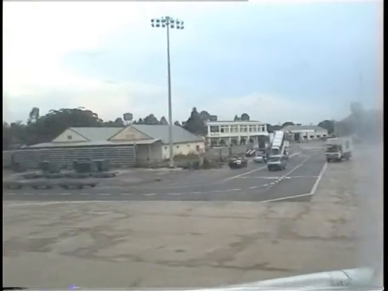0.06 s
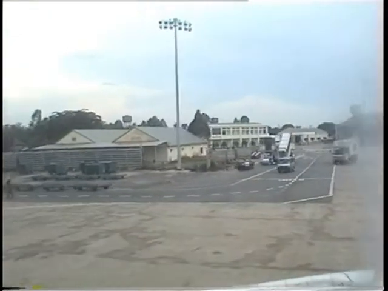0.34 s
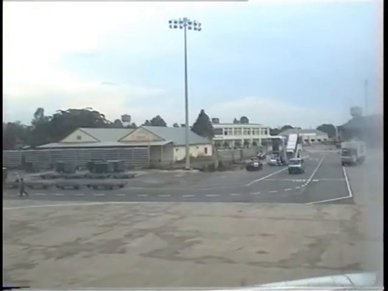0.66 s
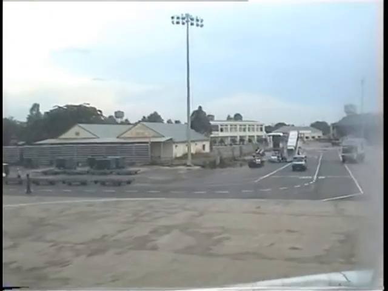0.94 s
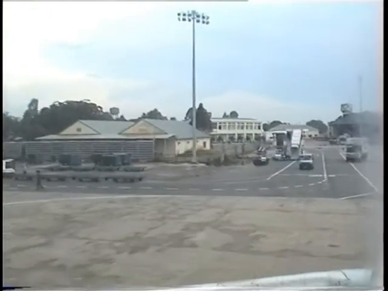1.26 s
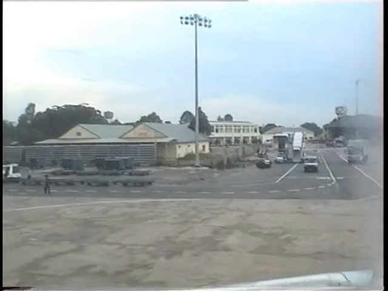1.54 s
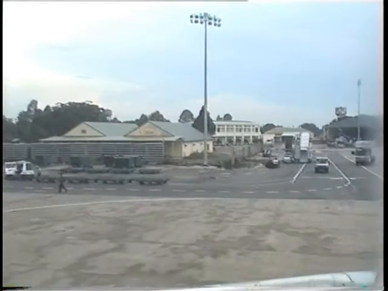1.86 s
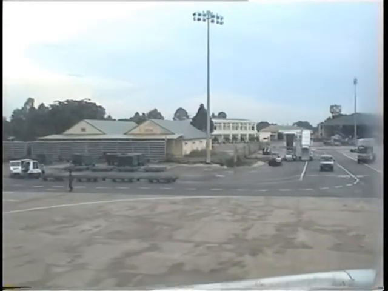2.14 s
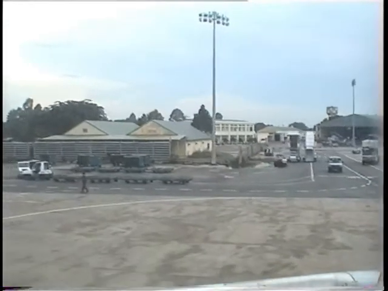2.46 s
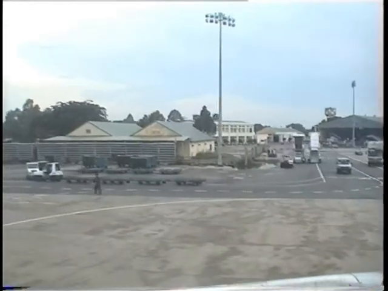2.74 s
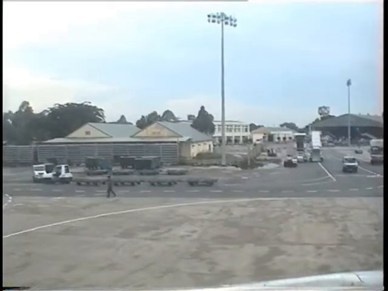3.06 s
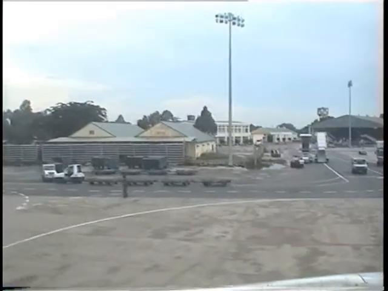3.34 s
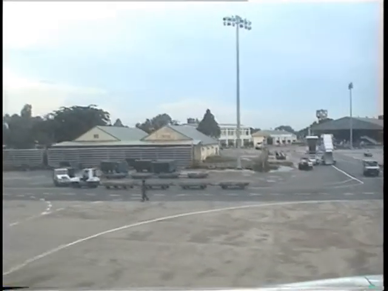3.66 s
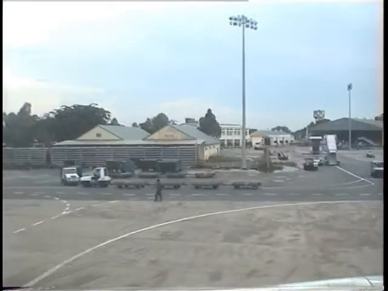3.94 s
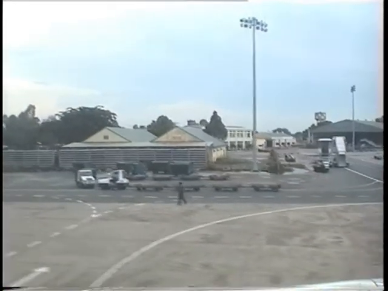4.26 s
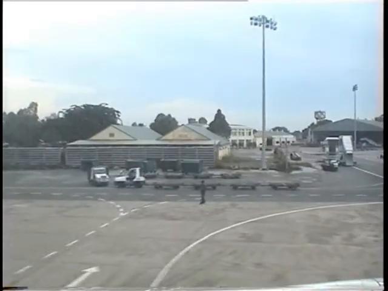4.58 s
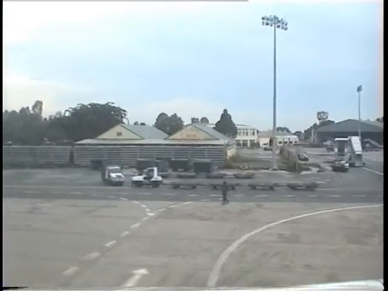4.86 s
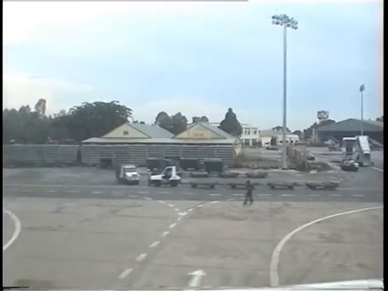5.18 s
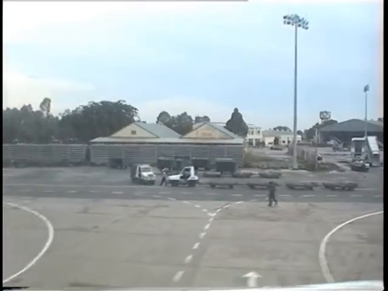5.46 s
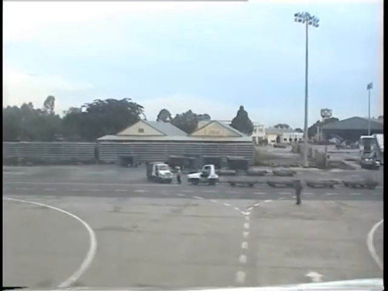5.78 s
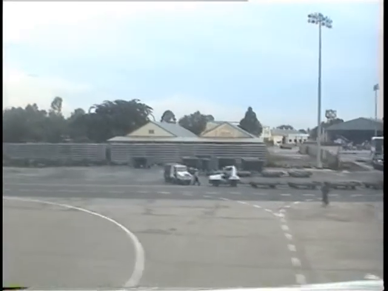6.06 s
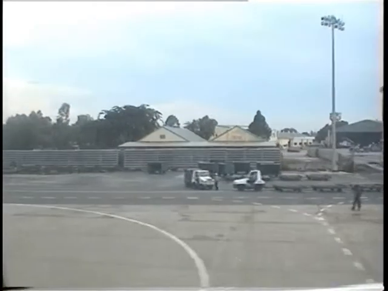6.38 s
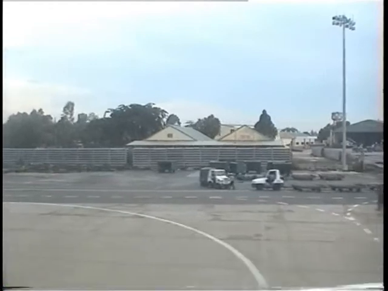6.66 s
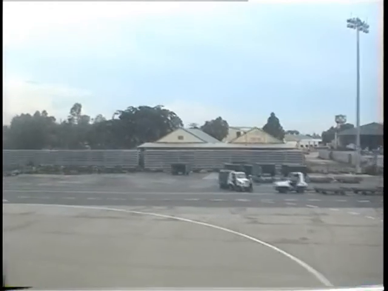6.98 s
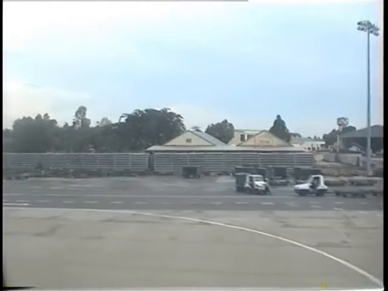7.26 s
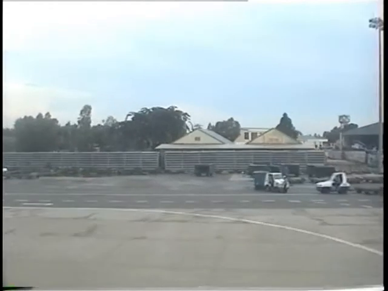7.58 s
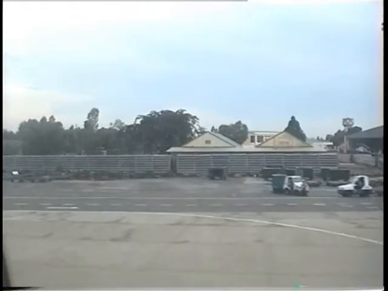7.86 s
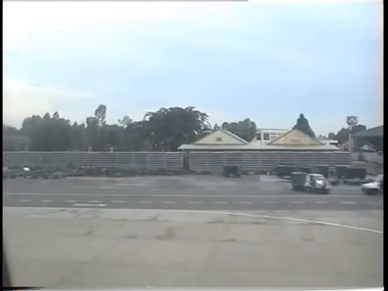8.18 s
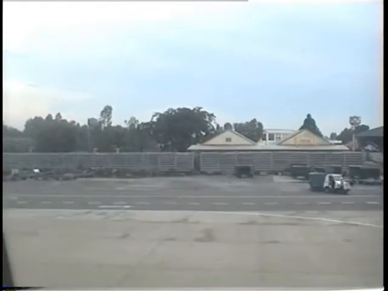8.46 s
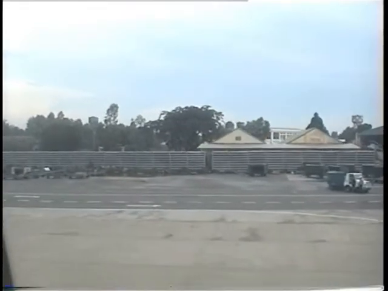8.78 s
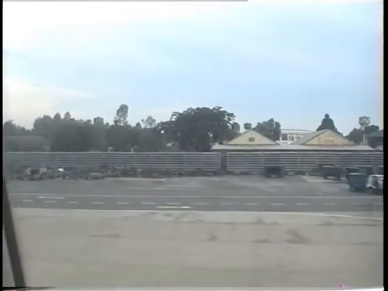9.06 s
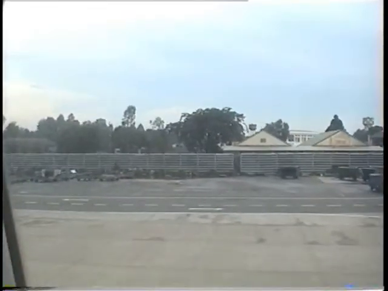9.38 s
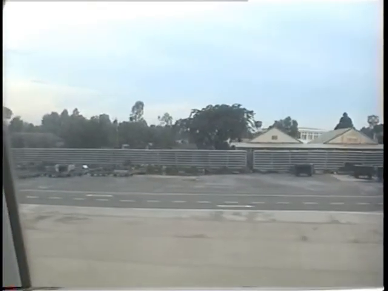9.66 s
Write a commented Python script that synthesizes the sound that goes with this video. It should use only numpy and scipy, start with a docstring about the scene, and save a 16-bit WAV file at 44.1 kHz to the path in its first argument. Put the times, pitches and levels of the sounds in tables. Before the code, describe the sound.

Heard from a window seat inside a taxiing airliner, idling jet engines make a low throbbing hum and a higher, slowly beating drone. Cabin air rushes all around and the wheels rumble under the floor, with faint thin whistles high above. From about halfway, soft thumps come from joints in the concrete, and nearby plastic panels rattle lightly and more often.

```python
"""Airliner cabin, taxiing and turning on the apron with the jets at idle; stereo pair at a window seat.
From outside, the engine shafts drive a throbbing hum and a higher, slowly beating drone through the hull.
The wheels rumble and thump under the floor, the cabin booms and air rushes all round the microphones.
Close by, trim panels rattle and fittings tick as the plane rolls; thin whistles stand high above it all."""
import sys
import numpy as np
from scipy import signal
from scipy.fft import rfft, irfft
from scipy.io import wavfile

SR = 44100
rng = np.random.default_rng(int(sys.argv[2]) if len(sys.argv) > 2 else 0)


def transcribe(signal):
    """Save signal, clipped to [-1, 1], as a 16-bit WAV file at the path in sys.argv[1]."""
    frames = np.atleast_2d(signal).T
    limited = np.clip(frames, -1, 1)
    pcm = np.round(limited * 32767).astype(np.int16)
    wavfile.write(sys.argv[1], SR, pcm)


N = 437472
TIME = np.arange(N) / SR
FREQS = np.maximum(np.arange(N // 2 + 1) * SR / N, 1)


def from_db(db):
    """Decibels to gain."""
    return 10 ** (np.asarray(db) / 20)


def rms_one(x):
    """Scale to unit rms."""
    return x / np.sqrt(np.mean(x ** 2) + 1e-20)


def in_time(rows):
    """Each column of a timed table, read at every sample."""
    times, *columns = np.transpose(rows)
    return [np.interp(TIME, times, column) for column in columns]


def over_hz(points):
    """A table read at every frequency, on a log axis."""
    hz, value = np.transpose(points)
    return np.interp(np.log(FREQS), np.log(hz), value)


def drift(rate_hz):
    """Smooth random wander of rms 1 that changes about `rate_hz` times a second."""
    count = 16384
    hz = np.arange(count // 2 + 1) * SR / N
    slow = irfft(rfft(rng.standard_normal(count)) / (1 + (hz / rate_hz) ** 4))
    return np.interp(TIME, np.linspace(0, N / SR, count), rms_one(slow))


def ripple(spacing_hz):
    """Random peaks and dips along the frequency axis."""
    knots = np.arange(0, SR / 2, max(spacing_hz, 5))
    return np.interp(FREQS, knots, rng.standard_normal(len(knots)))


def pan(balance_db):
    """Gains of the two microphones; a positive balance favours the left."""
    return from_db(np.array([[.5], [-.5]]) * balance_db)


def tone(hz, phase, balance_db, lead=0):
    """A stereo sine, rms 1 before panning; the left microphone leads by `lead` radians."""
    angle = 2 * np.pi * hz * TIME + phase + np.array([[.5], [-.5]]) * lead
    return np.sqrt(2) * pan(balance_db) * np.sin(angle)


def diffuse(spectrum, ripple_db=0, spacing_hz=100):
    """Coloured noise from all round the cabin: alike at both microphones in the bass, less so higher up."""
    # likeness of left and right: (frequency [Hz], correlation [-1 to 1])
    likeness = [(30, 0.91), (160, 0.95), (300, 1), (550, 0.65), (1200, 0.64), (1750, 0.69), (2200, 0.00033),
                (3600, -0.028), (5200, 0.33), (10000, 0.26), (15000, 0.53)]
    alike = np.clip(over_hz(likeness), -.99, .99)
    mid, side = rfft(rng.standard_normal((2, N))) * np.sqrt(SR / 4)
    pair = np.sqrt(1 + alike) * mid + np.sqrt(1 - alike) * side * [[1], [-1]]
    skirts = 1 / (1 + (spectrum[0][0] / FREQS) ** 4) / (1 + (FREQS / spectrum[-1][0] / 2) ** 8)
    colour = from_db(over_hz(spectrum) + ripple_db * ripple(spacing_hz))
    return irfft(pair * skirts * colour, N)


def bursts(events, t60, rise_s=0.006):
    """Envelope of contacts (time [s], peak [dB], hold [s]): each builds quickly, holds, then dies."""
    out = np.zeros(N)
    for start, peak_db, hold_s in events:
        near = slice(*np.searchsorted(TIME, [start - .05, start + .3]))
        age = TIME[near] - start
        rise_db = -3 + 20 * age / rise_s
        decay_db = -60 * np.maximum(age - hold_s, 0) / t60
        out[near] += from_db(peak_db + np.where(age < 0, rise_db, decay_db))
    return out


def shaft_hum(hum_hz=159.25, throb_hz=7.5, throb_spread_hz=3.2, throb_depth=0.3):
    """Unbalance of the slow shaft shakes the hull in a deep tone that throbs unevenly."""
    # the hum fades in mid-turn and comes back: (time [s], level [dB])
    hum_curve = [(0, -15.5), (1.4, -16.5), (2.3, -12.5), (3.6, -16), (4.3, -20), (5.1, -17.5), (5.7, -26.5),
                 (6.7, -26), (7.1, -24), (7.45, -29), (7.8, -15.5), (9.9, -13.5)]
    level_db, = in_time(hum_curve)
    angle = 2 * np.pi * throb_hz * TIME
    throb = drift(throb_spread_hz) * np.cos(angle) + drift(throb_spread_hz) * np.sin(angle)
    hum = tone(hum_hz, 0.16 * drift(1.3), balance_db=-1.0, lead=-0.15)
    return from_db(level_db) * (1 + throb_depth * throb) * hum


def shaft_drone(drone_hz=366.7, detune_hz=0.245):
    """The fast shafts of two engines drone; the far one runs slightly quicker, so they beat slowly."""
    # (harmonic [number], near engine [dB], far engine [dB], time the two are in phase [s])
    harmonics = [(1, -26.5, -37, 4.78), (2, -36.5, -44.5, 4.415)]
    wander = 0.11 * drift(0.32)
    out = np.zeros((2, N))
    for k, near_db, far_db, in_phase_s in harmonics:
        far_ahead = 2 * np.pi * detune_hz * (TIME - in_phase_s)
        for level_db, phase in (near_db, wander), (far_db, wander + far_ahead):
            out += from_db(level_db) * tone(k * drone_hz, k * phase, balance_db=-1.8, lead=k * 0.18)
    return out


def compressors(pitches_hz=(7020, 8683), gain_db=2.0, shimmer_db=1.5):
    """Two blade whines leak through the window, shimmering and swelling as the plane turns."""
    # (time [s], relative level of the lower whine [dB], of the upper whine [dB])
    whine_curves = [(0, -68, -68), (2.5, -65, -63.5), (4.6, -75, -74), (6.2, -72, -69.5), (8.3, -65, -72),
                    (9.9, -63, -67)]
    out = np.zeros((2, N))
    for hz, level_db in zip(pitches_hz, in_time(whine_curves)):
        gain = from_db(level_db + gain_db + shimmer_db * drift(6.7))
        out += gain * tone(hz, 0.65 * drift(3.0), balance_db=6.0)
    return out


def accessories():
    """Gears, pumps and fans sing faint tones, each swelling and wavering by itself."""
    # (frequency [Hz], level [dB], left over right [dB], waver [share of amplitude])
    machine_tones = [(126.4, -29.5, 1, 0.16), (171.5, -35.5, 3, 0.27), (276.8, -45.5, -11, 0.74),
                     (322.8, -41.5, -9, 0.35), (456.3, -43.5, 0, 0.98), (481, -46.5, -2, 0.64),
                     (821, -51.5, -14, .5), (973, -51, -4, 0.33), (1182, -53.5, 12, 0.27),
                     (1298, -51.5, -1, 0.33), (1466, -48, -7.5, 0.48), (7580, -72, 19, .2)]
    out = np.zeros((2, N))
    for hz, level_db, balance_db, waver in machine_tones:
        swell = rms_one(1 + waver * drift(0.83))
        out += from_db(level_db) * swell * tone(hz, 0.54 * drift(2.6), balance_db)
    return out


def wheels(thump_hold_s=0.022):
    """Wheels rumble on the concrete below; the cabin's low resonance booms, and harder at each joint."""
    # rumble through the floor: (frequency [Hz], density [dB per Hz])
    rumble_spectrum = [(10, -64), (28, -56), (40, -47.5), (60, -42), (77, -48.5), (92, -44.5), (125, -47.5),
                       (200, -60.5), (400, -80.5)]
    # the cabin's resonance: (frequency [Hz], density [dB per Hz])
    boom_spectrum = [(80, -55), (120, -47), (145, -40.5), (163, -38), (182, -43), (220, -51.5),
                     (320, -63.5)]
    # the rumble grows as the plane rolls on: (time [s], gain [dB])
    roll_curve = [(0, -1.5), (1.3, -2.5), (2.0, 0), (3.2, -1.5), (5.4, 0.5), (7.5, -0.5), (8.7, 1),
                  (9.9, 2.5)]
    # thumps at joints in the concrete: (time [s], level [dB])
    joints = [(4.045, -9.5), (5.04, -15), (5.395, -16.5), (5.645, -13.5), (6.375, -14.5), (7.813, -13)]
    roll_db, = in_time(roll_curve)
    rumble = from_db(roll_db) * diffuse(rumble_spectrum) * pan(balance_db=-0.2)
    jolts = bursts([(s, db, thump_hold_s) for s, db in joints], t60=0.1, rise_s=0.019)
    thumps = jolts * rms_one(diffuse(boom_spectrum))
    return rumble + thumps + diffuse(boom_spectrum)


def airflow(flutter_db=0.95, flutter_hz=15.0):
    """Turbulent air flutters through the cabin; the vents add a breathy whistle."""
    # broad rush of cabin air: (frequency [Hz], density [dB per Hz])
    air_spectrum = [(100, -68), (230, -52), (310, -50), (450, -56.5), (600, -58.5), (800, -60.5),
                    (1050, -65), (1550, -66.5), (2100, -73), (2700, -74), (3800, -82.5), (4600, -83),
                    (5400, -88.5), (15500, -94.5)]
    # narrow whistle of the vents: (frequency [Hz], density [dB per Hz])
    vent_spectrum = [(4100, -100), (4550, -82), (4680, -79), (5100, -100)]
    rush = diffuse(air_spectrum, ripple_db=1.0, spacing_hz=35) + diffuse(vent_spectrum)
    return from_db(flutter_db * drift(flutter_hz)) * rush * pan(balance_db=1.0)


def gush(gain_db=-0.5, start_s=0.011, end_s=0.279, attack_db_per_s=700, release_db_per_s=3000):
    """A brief, louder gush of air that opens quickly, holds and stops abruptly."""
    # colour of the gush: (frequency [Hz], relative level [dB])
    gush_colour = [(200, -42.5), (420, -48), (620, -51.5), (850, -53), (1050, -57.5), (1600, -58),
                   (2300, -67.5), (3200, -68.5), (5500, -74), (10000, -79), (15500, -87)]
    opening_db = attack_db_per_s * np.minimum(TIME - start_s, 0)
    closing_db = release_db_per_s * np.clip(end_s - TIME, -.5, 0)
    return from_db(gain_db + opening_db + closing_db) * diffuse(gush_colour) * pan(balance_db=1.2)


def trim(chatter_db=-6.0, knock_db=-4.0, tick_db=-6.0, grain_db=3.5):
    """Nearby plastic panels chatter in short, grainy bursts over a dull knock; small fittings tick."""
    # panel rattles: (time [s], relative chatter level [dB], relative knock level [dB])
    rattles = [(0.476, -34, -29), (0.79, -40, -22), (1.189, -36, -32), (1.62, -40, -38), (4.048, -41, -27),
               (4.094, -39, -35), (4.958, -24.5, -26), (5.341, -30.5, -21.5), (5.701, -34, -25),
               (6.046, -34, -23.5), (6.391, -31, -20), (6.726, -35, -25.5), (7.421, -27.5, -20),
               (7.744, -31.5, -22), (8.092, -36, -24), (8.236, -45, -21), (8.764, -41, -35),
               (9.419, -37, -25)]
    # ticks of the fittings, off to the left: (time [s], relative level [dB])
    fittings = [(0.343, -33.5), (0.685, -38), (0.784, -27.5), (3.115, -41), (3.911, -34.5), (5.771, -38),
                (5.853, -40), (7.124, -36)]
    # bright chatter of a panel: (frequency [Hz], relative level [dB])
    chatter_colour = [(1200, -11), (2800, 6), (4400, 3.5), (5600, -1), (8500, -4), (10500, -6.5),
                      (15500, -17)]
    # dull knock of a panel: (frequency [Hz], relative level [dB])
    knock_colour = [(200, -15), (500, 3), (800, -1), (1080, 0), (1300, -2.5), (1580, -6.5), (2400, -17),
                    (5000, -38)]
    # sharp tick of a fitting: (frequency [Hz], relative level [dB])
    tick_colour = [(1500, -20), (3000, -3), (5000, -11), (6700, -8), (7600, -4), (9300, -7), (10500, -4),
                   (11600, -17), (15500, -17)]
    chatter = bursts([(s, db + chatter_db, 0.017) for s, db, _ in rattles], t60=0.09, rise_s=0.021)
    knocks = bursts([(s, db + knock_db, 0.012) for s, _, db in rattles], t60=0.067, rise_s=0.0037)
    ticks = bursts([(s, db + tick_db, 0.0038) for s, db in fittings], t60=0.06)
    grain = rms_one(from_db(grain_db * drift(400.0)))
    layers = [(chatter, chatter_colour, 1.5), (knocks, knock_colour, 1.5), (ticks, tick_colour, 8)]
    out = np.zeros((2, N))
    for envelope, colour, balance_db in layers:
        resonances = rms_one(diffuse(colour, ripple_db=0.7, spacing_hz=122.7))
        out += envelope * resonances * pan(balance_db)
    return grain * out


def scene():
    """Everything that reaches the microphones at the window seat."""
    machinery = shaft_hum() + shaft_drone() + compressors() + accessories()
    return machinery + wheels() + airflow() + gush() + trim()


def record(dry, mirror_hz=12100, cutoff_hz=15750):
    """The cabin's tones are mirrored faintly around a high pitch as thin whistles; the top is cut."""
    slope = np.diff(dry.mean(axis=0), prepend=0)
    smoothed = signal.sosfilt(signal.butter(1, 1100.0, fs=SR, output="sos"), slope)
    whistles = from_db(-7.5) * smoothed * np.cos(2 * np.pi * mirror_hz * TIME)
    top_cut = (1 - np.tanh((FREQS - cutoff_hz) / 50)) / 2
    return irfft(rfft(dry + whistles) * top_cut, N)


dry = scene()
out = record(dry)
transcribe(out)
```